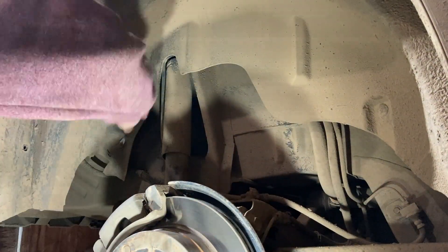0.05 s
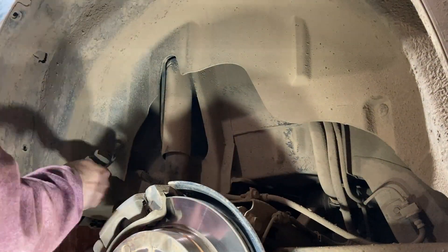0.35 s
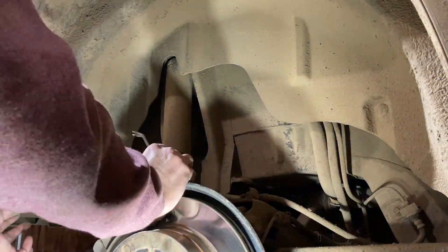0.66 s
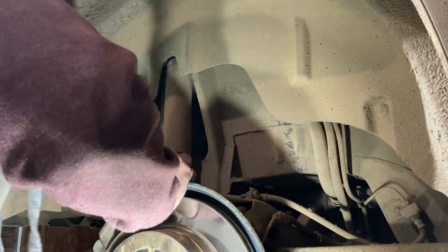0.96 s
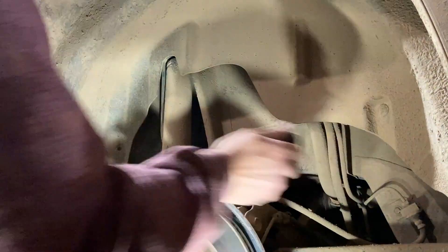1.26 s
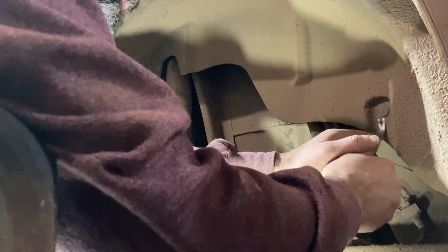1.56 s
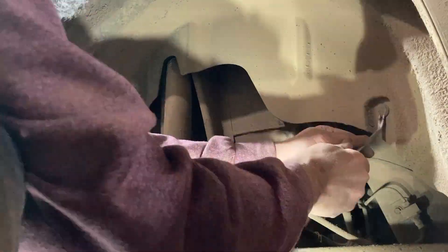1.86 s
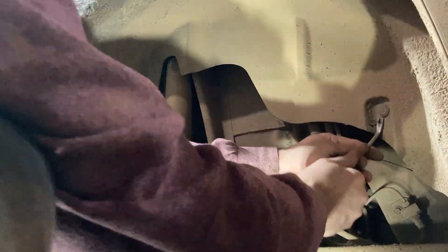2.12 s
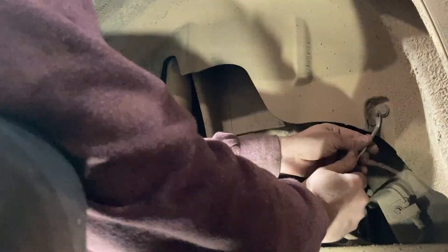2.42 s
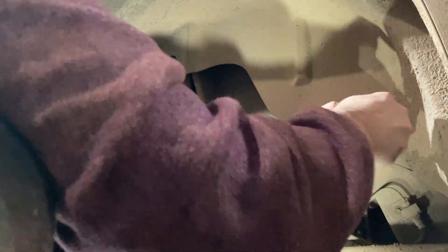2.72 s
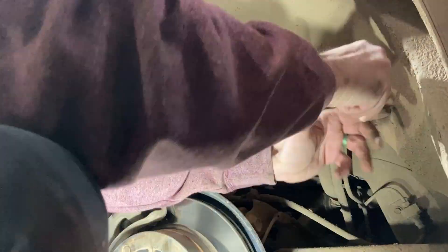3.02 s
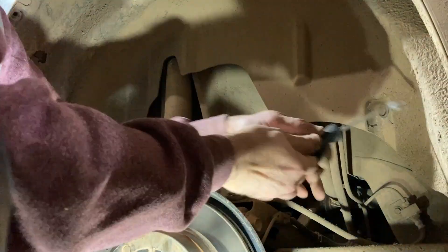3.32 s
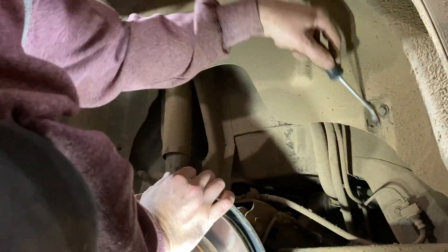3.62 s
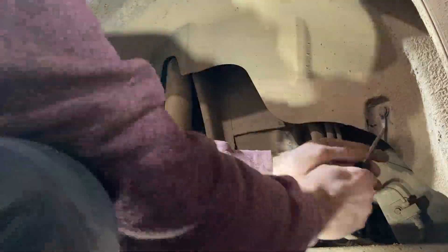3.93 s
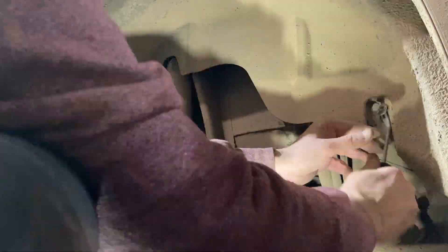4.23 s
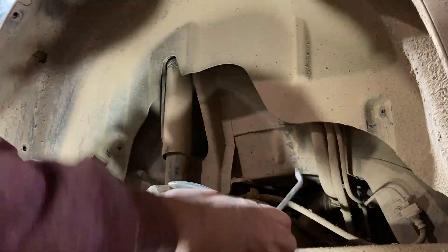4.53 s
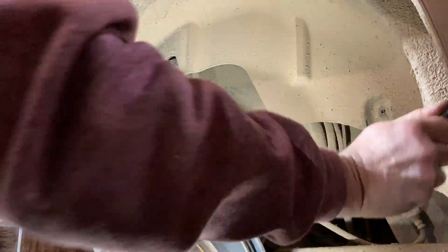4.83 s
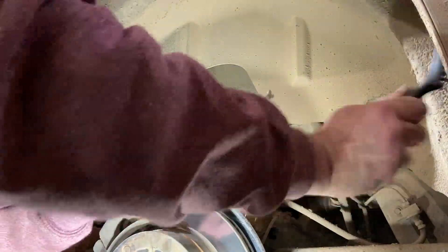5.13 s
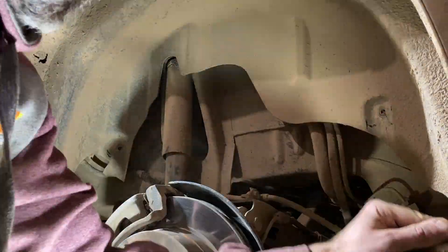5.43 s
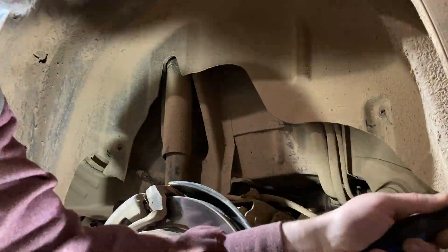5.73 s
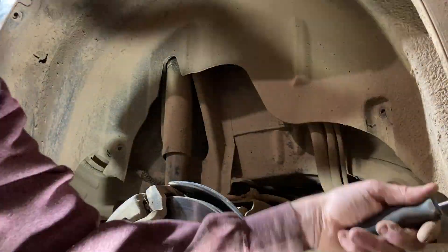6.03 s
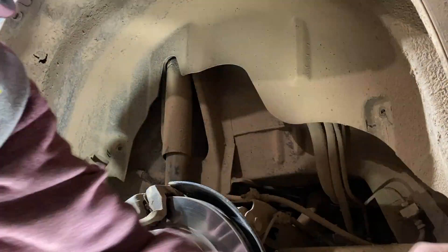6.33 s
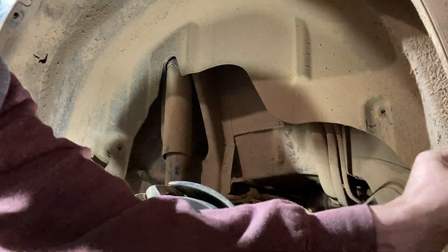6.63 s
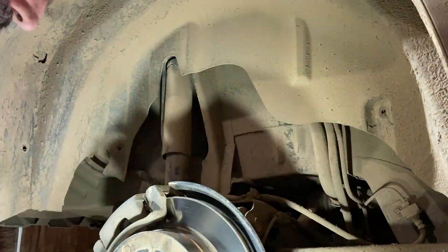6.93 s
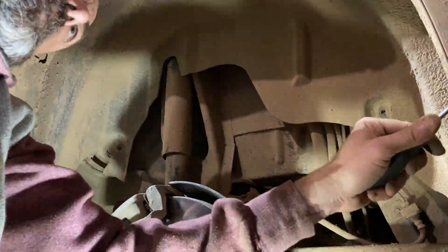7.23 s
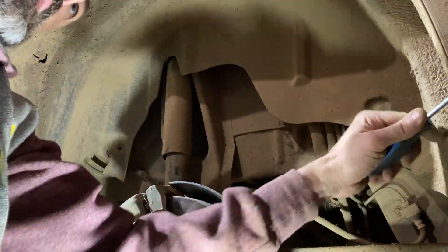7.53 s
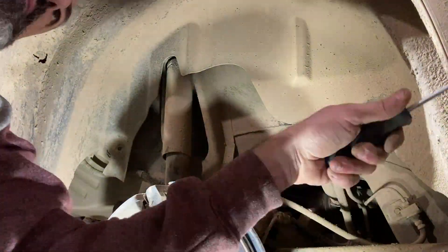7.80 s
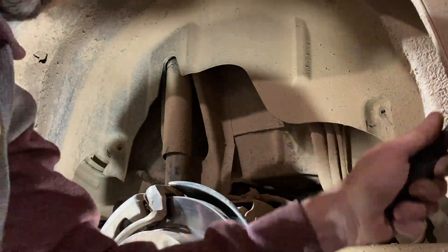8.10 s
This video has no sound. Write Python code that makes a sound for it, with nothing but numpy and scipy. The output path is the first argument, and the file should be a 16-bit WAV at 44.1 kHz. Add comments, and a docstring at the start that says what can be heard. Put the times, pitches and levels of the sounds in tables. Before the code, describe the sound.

Close, clipped clicks, knocks and gritty scrapes come in quick bursts as a pry tool works at a plastic car panel in a quiet garage.

```python
"""Prying rivets from a wheel arch

A quiet garage, a phone's two microphones close to a car's wheel arch. A steel pry tool works plastic push-pin
rivets out of the liner: snaps and knocks ring the panel, blade and hands scrape over it, and a sleeve rustles
in between. The sounds come in quick, short bursts; most of them stop abruptly."""
import sys
import numpy as np
from scipy import signal
from scipy.fft import rfft, irfft
from scipy.io import wavfile

SR = 44100
rng = np.random.default_rng(int(sys.argv[2]) if len(sys.argv) > 2 else 0)


def inscribe(sig):
    """Save sig as 16-bit PCM at rate SR to the path in sys.argv[1].

    A 1-D sig is mono; a 2-D sig holds one channel per row.
    Samples are clipped to [-1, 1] before scaling.
    """
    pcm = np.round(np.clip(np.atleast_2d(sig).T, -1, 1) * 32767)
    wavfile.write(sys.argv[1], SR, pcm.astype(np.int16))


N = 359856
TOP_HZ = 16000
# edges of a contact's four registers, low to high flex, knock, crack and grit: f/Hz
REGISTER_EDGES = [40, 300, 1600, 5000, 16000]


def undb(db):
    """Decibels to gain."""
    return 10 ** (np.asarray(db) / 20)


def unit(x):
    """Scale to rms 1."""
    return x / np.sqrt(np.mean(x ** 2) + 1e-18)


def fade(t, t60):
    """Free decay, 60 dB down after t60 seconds."""
    return np.exp(-np.log(1000) * t / max(t60, 1e-3))


def ringing(t, modes):
    """Struck modes (f/Hz, t60/s, level/dB); real and imaginary parts lie a quarter cycle apart."""
    return sum(undb(db) * np.exp(2j * np.pi * hz * t) * fade(t, t60) for hz, t60, db in modes)


def colour(x, points):
    """Shape a sound by a curve of f/Hz, level/dB."""
    hz, db = np.transpose(points)
    bins_hz = np.fft.rfftfreq(x.shape[-1], 1 / SR)
    gains = undb(np.interp(np.log(bins_hz + 1), np.log(hz), db))
    return irfft(rfft(x) * gains, x.shape[-1])


def band(x, lo_hz, hi_hz, order=4):
    """Causal band-pass."""
    return signal.sosfilt(signal.butter(order, [lo_hz, hi_hz], "band", fs=SR, output="sos"), x)


def walk(rate, size):
    """Random levels, rate of them a second, joined by straight lines; deviation near 1."""
    levels = rng.standard_normal(size)
    return np.sqrt(1.5) * np.interp(np.arange(size) * rate / SR, np.arange(size), levels)


def add(out, start, sound):
    """Mix a sound in at start seconds."""
    i = int(np.clip(start * SR, 0, N - 1))
    out[:, i:i + sound.shape[1]] += sound[:, :N - i]


def spread(pair):
    """Left and right microphone from a direct sound and its unrelated reflections in the arch."""
    # share that arrives by reflection: f/Hz, level/dB
    reflected = [(60, -11), (200, -16), (450, -8.5), (1200, -3), (2500, -1), (4500, -0.5), (7000, -10),
                 (15000, -38)]
    side = colour(pair[1], reflected)
    return np.array([pair[0] + side, pair[0] - side])


def turn(x, points):
    """Shift the left channel against the right by a curve of f/Hz, phase/rad."""
    phase = np.interp(np.fft.rfftfreq(N, 1 / SR), *np.transpose(points))
    return irfft(rfft(x) * np.exp(.5j * np.array([phase, -phase])), N)


def garage(level_db=-62.5):
    """Room tone: the faint, even hush of still air."""
    # spectrum of the air: f/Hz, density/dB
    room_tone = [(25, 10), (62, -4), (110, 12), (180, -19.5), (500, 2.5), (1200, -47), (3000, -24.5),
                 (8000, -24), (16000, -28)]
    return undb(level_db) * unit(spread(colour(rng.standard_normal((2, N)), room_tone)))


def walls(x, wet_db=-36, t60=0.098, size=16384):
    """The garage walls return a short echo, weak this close to the work."""
    tail = rng.standard_normal((2, size)) * fade(np.arange(size) / SR, t60)
    return undb(wet_db) * signal.fftconvolve(x, tail / np.linalg.norm(tail[0]), axes=1)[:, :N]


def slips(size, rate, scatter_db):
    """Tiny stick-slip jolts at random moments, rate a second, a few much larger than the rest."""
    strength = undb(scatter_db * np.minimum(rng.exponential(size=size), 4))
    return unit((rng.random(size) < rate / SR) * strength * rng.standard_normal(size))


def sleeve(rub_flutter_db=4, hiss_flutter_db=2, split_hz=1600, crumb_db=-9, trim_db=-1):
    """Cloth brushes the arch: a fluttering rub, a fine hiss and crackling dirt, all following the arm."""
    # strokes of the arm: t/s, length/s, rub/dB, hiss/dB
    strokes = [(0, 0.48, -51, -61), (0.604, 0.27, -42, -51), (0.932, 0.079, -54.5, -60.5),
               (1.097, 0.58, -62.5, -62.5), (1.684, 0.15, -42.5, -73), (2.001, 0.2, -52.5, -61),
               (2.253, 0.4, -61, -52), (2.778, 0.17, -50, -61.5), (2.95, 0.34, -51, -59),
               (3.364, 0.072, -44, -48), (3.446, 0.2, -49, -67), (3.692, 0.091, -58, -53),
               (3.944, 0.22, -45.5, -51.5), (4.164, 0.3, -43, -51.5), (4.463, 0.58, -52.5, -49),
               (5.111, 0.49, -48, -51.5), (5.648, 0.48, -48, -56), (6.023, 0.34, -47, -59),
               (6.299, 0.2, -41, -52), (6.484, 0.15, -45.5, -61), (6.62, 0.36, -50.5, -53),
               (7.024, 0.086, -54.5, -54.5), (7.204, 0.046, -48.5, -70), (7.309, 0.12, -52.5, -61.5),
               (7.597, 0.22, -44.5, -58.5), (7.987, 0.21, -49.5, -57)]
    # spectrum of cloth on plastic: f/Hz, density/dB
    cloth = [(30, -9.5), (65, 8.5), (100, 4), (170, 6), (400, 0.5), (1000, -7), (2000, -12.5),
             (5500, -16.5), (9000, -13), (16000, -15.5)]
    push = np.outer(undb([-63, -65.5]), np.ones(N))  # between strokes the cloth barely stirs
    for start, length, *levels_db in strokes:
        swell = np.abs(np.sin(np.linspace(0, np.pi, int(length * SR)))) ** 0.54
        add(push, start, np.outer(undb(levels_db), swell))
    fibres = spread(colour(np.array([slips(N, rate=12000, scatter_db=0) for _ in range(2)]), cloth))
    rub = unit(band(fibres, 31, split_hz)) * push[0] * undb(rub_flutter_db * walk(60, N))
    crumbs = spread(np.array([slips(N, rate=120, scatter_db=3) for _ in range(2)]))
    crackle = undb(crumb_db) * unit(band(crumbs, split_hz, TOP_HZ, order=1))
    hiss = unit(band(fibres, split_hz, TOP_HZ)) + crackle
    hiss *= push[1] * undb(hiss_flutter_db * walk(41, N))
    return undb(trim_db) * (rub + hiss)


def creak(start_s=8.078, length_s=.08, slip_hz=690, waver=.022, level_db=-50, size=4096):
    """Plastic strained by the blade sticks and slips at a nearly steady rate: a thin, pitched creak."""
    out, t = np.zeros((2, N)), np.arange(size) / SR
    cycles = np.cumsum(slip_hz * (1 + waver * walk(90, size))) / SR
    thin = unit(band(cycles % 1, 1900, 4400, order=5))
    swell = np.sqrt(np.abs(np.sin(np.pi * np.minimum(t / length_s, 1))))
    add(out, start_s, undb(level_db) * np.array([thin, thin]) * swell)
    return out


def clink(start_s=6.128, gain_db=-28, size=4096):
    """Steel touches steel as a tool is handled, and rings briefly."""
    # modes of the tool: f/Hz, t60/s, level/dB
    tool_modes = [(3779, 0.037, 2.5), (4200, 0.071, -6), (5480, 0.05, 6), (7100, .03, -9)]
    out = np.zeros((2, N))
    ring = ringing(np.arange(size) / SR, tool_modes)
    add(out, start_s, undb(gain_db) * spread(np.array([ring.imag, ring.real])))
    return out


def contact(force, response):
    """A force sounds a body: each jolt sets off its stereo response."""
    return signal.fftconvolve(force[None], response, axes=1)[:, :len(force)]


def squeals(size=4096):
    """The blade sticks and slips on a pin and rings with its own modes."""
    # catches of the blade: t/s, length/s, level/dB
    catches = [(1.346, 0.009, -28), (1.361, 0.0095, -25)]
    # modes of the steel blade: f/Hz, t60/s, level/dB
    blade_modes = [(3022, .018, -10), (4034, .05, 0), (4464, .05, -1)]
    out, t = np.zeros((2, N)), np.arange(size) / SR
    steel = ringing(t, blade_modes)
    for start, length, db in catches:
        force = slips(size, rate=2200, scatter_db=3) * (t < length)
        ring = contact(force, np.array([steel.real, steel.imag]))
        add(out, start, undb(db) * unit(ring) * np.sqrt(length * SR / size))
    return out


def grains(size, rate, centre_hz, scatter_db, scatter_oct=.8, ring_cycles=14):
    """Specks of grit catch and let go: very short rings, each at its own moment, pitch and strength."""
    out, t = np.zeros((2, size + 512)), np.arange(512) / SR
    for moment, pitch, strength, side in rng.random((int(rate * size / SR) + 1, 4)):
        hz = centre_hz * 2 ** (scatter_oct * (2 * pitch - 1))
        ring = ringing(t, [(hz, ring_cycles / hz, scatter_db * strength ** 2)])
        i = int(moment * size)
        out[:, i:i + len(t)] += [ring.imag, (2 * side - 1) * ring.real]
    return unit(spread(out[:, :size]))


def rasps(edge_s=0.0057, size=4096):
    """The tool's edge or a cuff grinds dried road dirt: a run of grains that leaves the panel still."""
    # drags through the dirt: t/s, length/s, grain pitch/Hz, level/dB
    drags = [(0.611, 0.068, 3000, -39), (0.74, 0.062, 3230, -38), (1.343, 0.045, 3070, -27.5),
             (1.378, 0.068, 2330, -26.5), (2.425, 0.025, 2170, -26), (3.286, 0.021, 2180, -20.5),
             (4.353, 0.051, 4200, -34), (5.722, 0.027, 4030, -40), (6.123, 0.017, 3870, -31.5),
             (6.511, 0.033, 2820, -45), (6.664, 0.015, 2400, -36), (6.83, 0.008, 3320, -25),
             (7.475, 0.043, 4580, -56), (8.111, .05, 3040, -52)]
    out, t = np.zeros((2, N)), np.arange(size) / SR
    for start, length, hz, db in drags:
        bite = np.clip(np.minimum(t, length - t) / edge_s, 0, 1)
        add(out, start, undb(db) * bite * grains(size, rate=1500, centre_hz=hz, scatter_db=14))
    return out


def click(t, t60, edge_db=6, edge_t60=0.00087):
    """The dry crack of hard plastic or steel, straight from the contact: a hard edge and a short fizz."""
    return spread(rng.standard_normal((2, len(t))) * (fade(t, t60) + undb(edge_db) * fade(t, edge_t60)))


def ticks(size=1024):
    """Thin, bright ticks of pins and blade, alone or as the sharp edge of a knock."""
    # ticks: t/s, level/dB, lowest f/Hz
    touches = [(0.0908, -19.5, 7000), (0.1735, -34.5, 4000), (0.3888, -25, 6030), (0.414, -15, 7040),
               (0.434, -22, 10000), (0.764, -36, 1600), (0.8562, -30, 3500), (1.4381, -8.5, 7100),
               (1.53, -32, 5000), (1.813, -53, 4000), (2.0531, -26, 3500), (2.0712, -34, 3000),
               (2.173, -30, 2500), (2.481, -29, 5000), (2.547, -34, 2000), (3.2822, -26, 1200),
               (3.474, -35, 2000), (3.521, -34, 1200), (3.534, -29.5, 1000), (3.587, -46, 2500),
               (3.608, -61, 2500), (3.62, -54, 2000), (3.811, -43, 4000), (3.876, -36, 1600),
               (4.053, -37, 5000), (4.089, -35, 1800), (4.113, -33, 1800), (4.176, -31, 5000),
               (4.227, -40, 7000), (4.235, -33, 7000), (4.566, -27, 3000), (4.618, -27, 6000),
               (4.631, -37, 1010), (5.356, -31, 4000), (5.4, -26, 2500), (5.522, -39, 6000),
               (5.934, -39, 8000), (6.269, -37, 2500), (6.4025, -31, 1600), (6.499, -48, 3000),
               (6.56, -29, 5000), (6.666, -42, 2000), (6.8122, -43, 2500), (6.834, -30, 2200),
               (7.004, -49, 2980), (7.176, -36.5, 3500), (7.657, -32, 1600), (7.796, -34, 2000),
               (7.9802, -38, 1600)]
    out, t = np.zeros((2, N)), np.arange(size) / SR
    for start, db, lo_hz in touches:
        add(out, start, undb(db) * band(click(t, t60=.006), lo_hz, TOP_HZ, order=2))
    return out


def thumps():
    """A heavy shove makes the whole wheel arch boom for a few cycles."""
    # shoves on the arch: t/s, f/Hz, length/s, level/dB
    shoves = [(0.415, 154, 0.034, -22), (2.829, 176, 0.027, -13), (3.469, 67, 0.038, -19),
              (3.475, 151, 0.035, -13.5), (7.62, 145, 0.069, -35)]
    out = np.zeros((2, N))
    for start, hz, length, db in shoves:
        t = np.arange(int(length * SR)) / SR
        boom = np.sin(2 * np.pi * hz * t) * np.sqrt(np.sin(np.pi * t / length))
        add(out, start, undb(db) * np.array([boom, boom]))
    return out


def panel(spot_modes, longest_t60, dense_db, dense_t60, size=4096):
    """The liner answers one jolt with broad modes, the ring of the touched spot and dense overtones."""
    # modes of the liner on its sheet-metal arch: f/Hz, t60/s, level/dB
    liner_modes = [(68, 0.016, 3), (161, 0.058, 9), (221.3, 0.032, 11), (219.6, 0.17, 4), (333, 0.044, 9),
                   (421, 0.21, 0.5), (476, 0.23, 0.5), (588, 0.075, 0.5), (717.5, 0.068, 5),
                   (820, 0.068, -0.5), (930, 0.11, -17.5), (1035, 0.067, -11.5), (1350, 0.047, -23),
                   (1540, 0.012, 10.5), (2240, 0.032, -13), (3000, 0.013, -7), (3900, 0.032, -9),
                   (4180, 0.022, -25.5)]
    # spectrum of the short-lived overtones: f/Hz, level/dB
    overtones = [(40, -23.5), (65, -5), (100, -10.5), (160, -4.5), (500, 5.5), (1100, -3), (2000, -6),
                 (3200, -13.5), (5500, -16.5), (8500, -13.5), (12000, -13.5), (16000, -22)]
    t = np.arange(size) / SR
    modes = []
    for hz, t60, db in liner_modes:
        detuned_hz = hz * (1 + 0.009 * rng.standard_normal())
        modes.append(undb(db) * np.cos(2 * np.pi * detuned_hz * t) * fade(t, min(t60, longest_t60)))
    # every place on the panel moves the modes with its own sign and strength
    shares = rng.choice([-1, 1], (2, len(modes))) * rng.uniform(0.23, 1, (2, len(modes)))
    dense = unit(colour(rng.standard_normal((2, size)), overtones)) * fade(t, dense_t60)
    ring = ringing(t, spot_modes)
    spot = np.array([ring.imag, rng.choice([-1, 1]) * ring.real])  # reflection a quarter cycle off
    return spread(shares @ np.array(modes) + spot + undb(dense_db) * dense)


def registers(sound, length, stop_s, flex_low_hz=REGISTER_EDGES[0], knock_top_hz=REGISTER_EDGES[2]):
    """Flex, knock, crack and grit of a sound stopped short; each has rms near 1 over its length."""
    t = np.arange(sound.shape[1]) / SR
    stop = np.exp(-np.clip((t - length) / stop_s, 0, 20))
    flex, knock = (flex_low_hz, REGISTER_EDGES[1]), (REGISTER_EDGES[1], knock_top_hz)
    crack, grit = REGISTER_EDGES[2:4], REGISTER_EDGES[3:]
    parts = [unit(band(sound, lo, hi, order=3) * stop) for lo, hi in (flex, knock, crack, grit)]
    return np.array(parts) * np.sqrt(length * SR / len(t))


def balance(parts, level_db, flex_db, tilt, crack_oct=2.12, grit_oct=3.68):
    """Mix the four registers: a harder contact tilts the octaves above the knock upward."""
    gains = undb(level_db + np.array([flex_db, 0, tilt * crack_oct, tilt * grit_oct]))
    return np.tensordot(gains, parts, 1)


def scrapes(start_db=-8, end_db=-6, judder_db=2.5, catch_db=-11, size=6400):
    """Blade, pin or hand drags over dusty plastic: slips under a push that swells, judders and eases."""
    # drags over the liner: t/s, length/s, place of hardest push/0-1, level/dB, tilt/(dB/octave)
    drags = [(0.031, 0.06, 0.28, -43, 0.7), (0.173, 0.062, 0.23, -46.5, -3),
             (0.324, 0.014, 0.2, -43.5, -1.5), (0.393, 0.024, 0.9, -48.5, .5),
             (0.463, 0.048, 0.85, -44, -1), (0.576, 0.084, 0.4, -45.5, -1), (0.634, 0.041, 0, -41, -1),
             (0.725, 0.081, 0.63, -38, -2), (0.782, 0.085, 0.15, -43, -3), (1.113, 0.057, 0.43, -56.5, 2),
             (1.189, .04, 0.97, -40, -3.5), (1.337, 0.052, 0.67, -35.5, 0),
             (1.377, 0.074, 0.95, -32.5, -3.5), (1.454, 0.06, 0.2, -30, -0.96),
             (1.666, 0.13, 0.64, -47, -0.2), (1.844, 0.04, 0.45, -35.5, -1.5),
             (2.028, 0.014, 0.1, -49, 0.5), (2.099, 0.032, 0.4, -43, -3), (2.292, 0.093, 0.85, -44.5, -6),
             (2.389, 0.0065, 0.9, -32, -5.5), (2.417, 0.028, 0.9, -36.5, -1), (2.453, 0.007, .8, -33, -3),
             (2.477, 0.0071, 0.5, -30.5, -0.5), (2.503, 0.03, 1, -40.5, -5.5),
             (3.013, 0.036, 0.52, -34, -2), (3.08, 0.0093, 0.7, -42.5, 1), (3.136, 0.027, 0.74, -34, -2.5),
             (3.811, 0.049, 0.34, -41.5, -1.5), (3.864, 0.017, 0.6, -40, -3.5),
             (4.115, 0.073, 0.2, -38.5, -6), (4.176, 0.062, 0.9, -55, 1.5), (4.27, 0.02, 0.5, -41.5, -5),
             (4.329, 0.063, 0.92, -38, 0.1), (4.616, 0.028, 0.2, -42.5, -0.1),
             (4.693, 0.026, 0.44, -37.5, -0.5), (4.763, 0.018, 0.17, -34.5, 0.95),
             (4.809, 0.054, 0.66, -40.5, 2.5), (4.86, 0.12, 0.32, -41, 0.4), (4.956, 0.011, 0.94, -37, 0),
             (4.979, 0.029, 0.5, -29.5, 1.5), (5.136, 0.026, 1, -30, -0.5),
             (5.197, 0.046, 0.77, -33.5, 1.5), (5.718, 0.0088, 0.9, -49, 4.5), (5.759, 0.054, 0.33, -43, 0),
             (5.822, 0.011, 0.2, -49, 3), (5.85, 0.07, 0.34, -41.5, -5), (5.931, 0.046, 0.94, -45.5, -1),
             (6.117, 0.012, 0.4, -37, -4.5), (6.171, 0.072, 0, -48.5, -0.5), (6.326, .022, 1, -46, -1.5),
             (6.396, 0.065, 1, -54, 1), (6.646, 0.044, 0.2, -47, -4), (6.768, 0.066, 0.46, -46, -6.5),
             (7.17, 0.057, 0.06, -53, -1.5), (7.457, 0.041, 0.3, -48.5, -1), (7.592, 0.08, 0.73, -59.5, 3),
             (7.889, 0.031, 0.35, -41, -5), (7.989, 0.073, 0, -38, -4.5), (8.121, 0.034, 0.9, -40.5, -3)]
    out, t = np.zeros((2, N)), np.arange(size) / SR
    for start, length, crest, level_db, tilt in drags:
        push_db = np.interp(t / length, [0, np.clip(crest, .01, .99), 1], [start_db, 0, end_db])
        ring_hz = 870 * 2 ** (0.35 * rng.standard_normal())
        rasp_hz = 3990 * 2 ** (0.346 * min(tilt, 0))  # a softer contact rasps lower
        spot_modes = [(ring_hz, .025, 7), (rasp_hz, .009, 9)]
        body = 0
        # two points of the blade touch by turns, so the rasp keeps changing colour
        for _ in range(2):
            force = slips(size, rate=6500, scatter_db=3) * undb(push_db + judder_db * walk(173.3, size))
            response = panel(spot_modes, longest_t60=0.025, dense_db=19.5, dense_t60=0.013, size=2048)
            body = body + contact(force, response)
        caught_grit = grains(size, rate=510, centre_hz=2570, scatter_db=0.5) * undb(push_db)
        body = unit(body) + undb(catch_db) * unit(caught_grit)
        flex_db = -8.5 - 1.73 * tilt  # a softer contact flexes the panel more
        add(out, start, balance(registers(body, length, stop_s=0.0035), level_db, flex_db, tilt))
    return out


def knocks(tight_t60=0.086, snap_t60=.014, blunt_attack_s=0.0015, size=4096):
    """A pin lets go or the tool lands: a click and a jolt, then the loose panel chatters on the arch."""
    # snaps and knocks: t/s, length/s, ring of the spot/Hz, sharpness (click's share of the treble)/0-1,
    # level/dB, flex over that level/dB, tilt/(dB/octave), cleanness of the ring/0-1
    blows = [(0.094, 0.0092, 1480, 0.8, -41, -3, 1, 0), (0.271, 0.0092, 400, 0.5, -32.5, -5, -10, 0.5),
             (0.276, 0.015, 327, 0.5, -42.5, -11, 0.5, 0.3),
             (0.297, 0.0058, 564, 0.1, -30.5, -11, -12, 0.4), (0.4116, 0.043, 505, 0, -31, 1, -4.5, 1),
             (0.654, 0.0064, 1390, 0.6, -26.5, -28, -5, 0.3),
             (0.7615, 0.0048, 1210, 0.7, -31, -12, -1, 0.3), (1.284, 0.0063, 600, 0.1, -43, 2, -3.5, 0.5),
             (1.4393, 0.018, 564, 0.36, -35.5, -11, 2, 0.2),
             (1.469, 0.037, 1000, 0.4, -32, -0.5, -0.5, 0.4), (1.526, 0.041, 1340, 0.02, -47, -7, 2, 0),
             (1.568, 0.0023, 925, 0.5, -31.5, -13, -4.5, 0.7), (1.732, 0.03, 500, 0.06, -24.5, -1, -7, 0.4),
             (1.747, 0.023, 538, 0.6, -30, -12, -2, 0.5), (2.0514, 0.01, 1020, 0.3, -21, -35, -5, 0.3),
             (2.07, 0.0043, 375, 0.75, -27, 4, -10, 0.7), (2.135, 0.039, 563, 0, -34.5, -2.5, -1.5, 0.3),
             (2.434, 0.018, 725, 0.4, -26, -20, -5, 0), (2.4846, 0.016, 506, 0.3, -17, -11, -8, 0.85),
             (2.544, 0.033, 480, 0, -32, 3.5, -4.5, 0), (2.5827, 0.007, 820, 0.6, -18, -11, -4, 0),
             (2.591, 0.036, 471, 0.43, -25, 4, -6.5, 1), (2.7595, 0.015, 1060, 0.1, -39, -10, -3, 0.5),
             (2.824, 0.0049, 900, 0.87, -12.5, -27, -4, 0), (2.828, 0.0026, 605, 0.1, -6, -8, -8.5, 0.8),
             (2.831, 0.042, 533, 0, -20, -2, -5.5, 0.63), (3.2788, 0.0028, 405, 0.8, -15.5, 0, -7, 0.67),
             (3.2884, 0.02, 1157, 0.44, -15.5, -8.5, -4.5, 0.03),
             (3.474, 0.012, 195, 0.2, -30, 15.5, -3.5, 0.4), (3.489, 0.03, 368, 0.1, -18.5, 6.5, -8, 0.77),
             (3.515, 0.0086, 300, 0, -25, 5.5, -3.5, 0.3), (3.518, 0.0044, 760, 0.2, -19.5, -10, -9.5, 0.2),
             (3.57, 0.019, 460, 0.4, -23, -11, -11.5, 1), (3.598, 0.047, 464, 0.1, -46.5, 13.5, -20, 1),
             (3.664, 0.04, 524, 0.05, -45.5, 2.5, -5, 0), (3.989, 0.075, 553, 0, -36, 4.5, -6.5, 0.4),
             (4.0883, 0.041, 516, 0.43, -32.5, 2, -5.5, 0.74),
             (4.2495, 0.021, 1035, 0.45, -22, -3, -5.5, 0.2),
             (4.534, 0.048, 1340, .2, -39.5, 0.5, -1.5, 0.24), (4.69, 0.0038, 480, 0, -50, -1, -6, .5),
             (4.78, 0.043, 1112, 0.13, -23.5, -19, -2.5, 0.8),
             (4.793, 0.02, 1450, 0.2, -23, -11, -2.5, 0.85), (4.847, .021, 830, 0.1, -22.5, -1, -3, 0.03),
             (4.944, 0.0064, 438, 0, -30, -3, -6, 0.8), (4.9669, 0.034, 830, 0.01, -17.5, -14, -2, 0),
             (5.154, 0.04, 610, 0, -27, -8.5, 0.5, 0.16), (5.202, 0.04, 453, 0, -29.5, -9, -12, 0.7),
             (5.31, 0.026, 417, 0.83, -36, -1.5, -1, 0.7), (5.414, 0.03, 840, 0.77, -32.5, -3, -4, 0),
             (5.728, 0.03, 700, 0, -31.5, -8.5, -0.5, 0.15), (5.797, 0.021, 490, 0, -33.5, -5, -6, 0.4),
             (6.082, 0.019, 770, 0.2, -38.5, -1, -9, 0.3), (6.13, 0.029, 1153, 0.9, -29, 3.5, -2.5, 0.17),
             (6.198, 0.027, 545, 0, -35.5, -1.5, -10.5, 0.6), (6.253, 0.015, 820, 0, -27.5, -7.5, -5, 0.35),
             (6.316, 0.012, 375, 0.03, -42, 6, -6, 0.3), (6.3392, 0.0096, 994, 0, -32.5, -2, -6.5, 0.26),
             (6.395, 0.0065, 350, 0, -24.5, -2, -7, 0.88), (6.414, .022, 426, 0.5, -39.5, 2, -4, 0.1),
             (6.439, 0.015, 590, 0.5, -36.5, 3.5, -8, 0.9), (6.516, 0.034, 850, 0.2, -39, -16, -13, 0),
             (6.529, 0.017, 418, 0.2, -36, 7.5, -7, 0.3), (6.587, .02, 382, 0.1, -55, 4, -2, 0.6),
             (6.63, 0.019, 700, 0.4, -42, 0.5, -5.5, 0), (6.663, 0.014, 1300, 0.4, -34, -22, -3.5, 0.3),
             (6.7157, 0.009, 726, 0, -23, -25, -7.5, 1), (6.7215, 0.017, 1104, 0.25, -22.5, -31, -3, 1),
             (6.811, 0.02, 374, 0.7, -36.5, 1.5, -5, 0.57), (6.8335, 0.0072, 960, 0.3, -29, -4, -3.5, 0.4),
             (7.0877, 0.024, 407, 0, -36.5, 1.5, -10, 0.84), (7.624, 0.025, 187, .2, -49.5, 13, -0.5, 0.7),
             (7.6536, 0.028, 432, 0.74, -27.5, -4, -8.5, 0.58),
             (7.729, 0.0086, 1010, 0.3, -47.5, 2, 1.5, .3), (7.788, 0.034, 470, 0, -27, -5, -6.5, 0.56),
             (7.915, 0.0078, 600, 0.2, -15, -3.5, -7.5, 0.2), (7.922, 0.0099, 405, 0.1, -17, 1, -10, 1),
             (7.929, 0.0014, 456, 0.75, -16, 0, -6.5, 1), (7.981, 0.01, 460, 0.5, -24, -4, -11.5, 0.9),
             (8.013, 0.022, 410, 0.1, -33, -11, -6.5, 0.9)]
    # a light blow moves only the small, higher parts of the panel: flex level/dB, lowest f/Hz
    flex_reach = [(-29.5, 150), (-15.5, 55)]
    out, t = np.zeros((2, N)), np.arange(size) / SR
    for start, length, ring_hz, sharp, level_db, flex_db, tilt, clean in blows:
        # a longer knock means a looser panel; a sharp snap dies sooner
        t60 = (tight_t60 + 10 * length) * (1 - 0.35 * sharp)
        chatter = slips(size, rate=5000, scatter_db=3) * fade(t, 0.61 * t60)
        # a cleanly struck spot rattles less and rings longer and louder
        force = (1 - 0.44 * clean) * chatter / np.linalg.norm(chatter)
        force[0] += 1  # the jolt itself
        spot_mode = (ring_hz, 0.028 + 0.024 * clean, 8.5 + 9 * clean)
        build_up = np.minimum(t / max(blunt_attack_s * (1 - sharp), 1 / SR), 1)
        body = build_up * contact(force, panel([spot_mode], t60, dense_db=10.5, dense_t60=0.053))
        low_hz = np.interp(level_db + flex_db, *np.transpose(flex_reach))
        top_hz = np.clip(2.25 * ring_hz, 920, REGISTER_EDGES[2])  # a low, slack spot knocks duller
        body_parts = registers(body, length, stop_s=0.0021, flex_low_hz=low_hz, knock_top_hz=top_hz)
        click_parts = registers(click(t, snap_t60), length, stop_s=0.0011)
        click_share = sharp * np.array([0, 0, 0.11, 1])[:, None, None]  # crack and grit only
        parts = np.sqrt(1 - click_share) * body_parts + np.sqrt(click_share) * click_parts
        add(out, start, balance(parts, level_db, flex_db, tilt))
    return out


def scene(from_left_until_s=1.62):
    """Tool and sleeve close to the microphones, first from the left, then from ahead; the room behind."""
    # overall tone of the knocks and scrapes, slightly lifted near 1 kHz: f/Hz, level/dB
    work_tone = [(35, 2.5), (66, 1), (100, -0.5), (155, 1), (210, 0), (320, 1), (700, -0.5), (1000, 4),
                 (1600, -0.5), (3000, 0)]
    # lead of the left microphone while the worker reaches in from that side: f/Hz, phase/rad
    left_lead = [(0, 0), (1800, 3.7), (3000, 6.28)]
    contacts = knocks() + scrapes() + rasps() + squeals() + clink() + creak() + ticks() + thumps()
    work = colour(contacts, work_tone)
    near = work + sleeve()
    at_left = np.arange(N) / SR < from_left_until_s
    return turn(near * at_left, left_lead) + near * ~at_left + walls(work) + garage()


def record(dry):
    """A left-right phase shift widens the treble; the phone clips at full scale and cuts the top."""
    # left channel against the right: f/Hz, phase/rad
    treble_phase = [(0, 0), (1400, -.3), (2600, -1.2), (4400, -1), (5400, -3.14), (6900, -6.28),
                    (16100, -18.85)]
    clipped = np.clip(turn(dry, treble_phase), -1, 1)
    return signal.sosfilt(signal.ellip(10, .2, 80, TOP_HZ, fs=SR, output="sos"), clipped)


dry = scene()
out = record(dry)
inscribe(out)
```